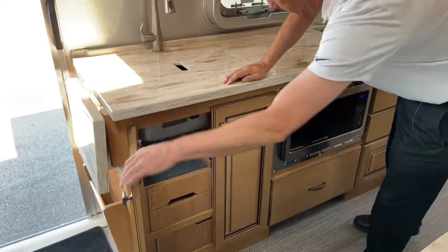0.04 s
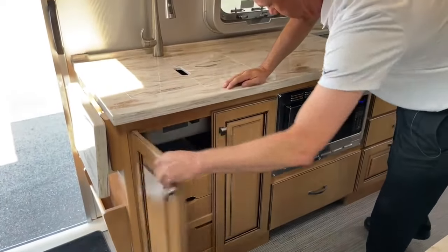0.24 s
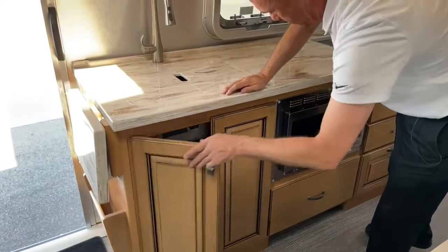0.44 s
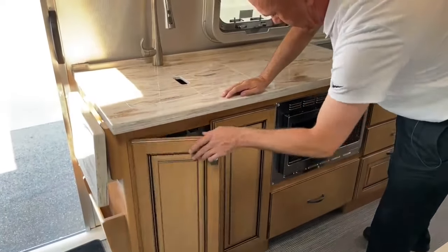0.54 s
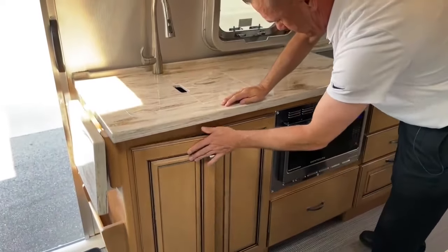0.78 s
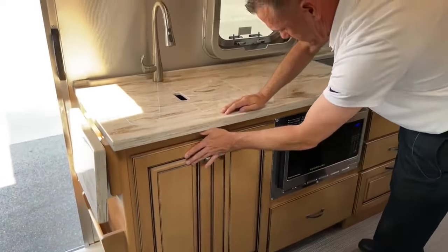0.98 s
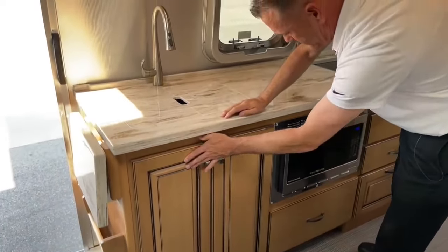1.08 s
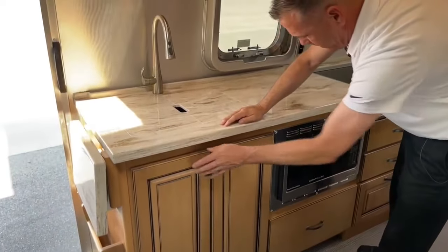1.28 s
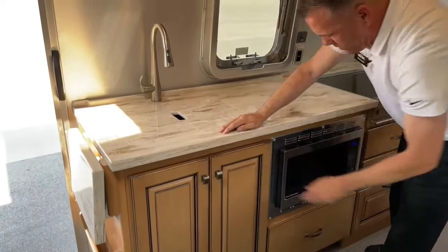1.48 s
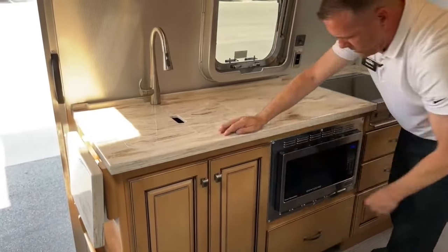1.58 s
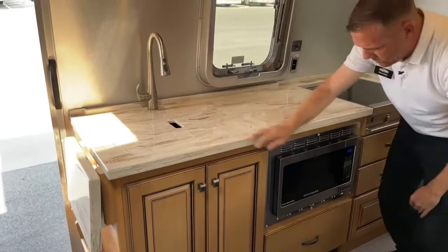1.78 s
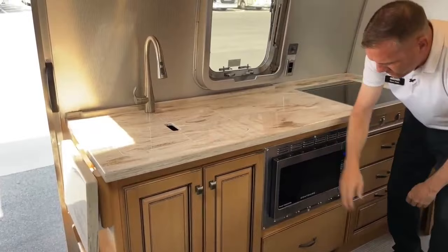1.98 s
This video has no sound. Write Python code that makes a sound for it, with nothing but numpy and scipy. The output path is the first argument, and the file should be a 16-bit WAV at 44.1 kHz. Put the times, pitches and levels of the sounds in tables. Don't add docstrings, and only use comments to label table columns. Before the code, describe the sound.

One sharp wooden knock as a cabinet door closes, latch rattling just before it, then a short woody tail, light ticks and hand rustles. Low ventilation hum throughout, small room, heard from a step away, slightly right.

```python
import sys
import numpy as np
from scipy import signal
from scipy.io import wavfile

SR = 44100
rng = np.random.default_rng(int(sys.argv[2]) if len(sys.argv) > 2 else 0)


def linear_from_db(decibels):
    return 10 ** (np.asarray(decibels, float) / 20)


def put_to_file(sound):
    columns = np.atleast_2d(sound).T
    safe = np.clip(columns, -1, 1)
    whole_steps = np.round(safe * 32767)
    wavfile.write(sys.argv[1], SR, whole_steps.astype(np.int16))


N = 89478
T = np.arange(N) / SR


def rms_one(x):
    return x / np.sqrt(np.mean(x ** 2) + 1e-20)


def drift(rate_hz):
    hop = 40
    r = np.exp(-2 * np.pi * rate_hz * hop / SR)
    steps = rng.standard_normal(N // hop + 2002)
    slow = rms_one(signal.lfilter([1], [1, -2 * r, r * r], steps)[2000:])
    return np.interp(np.arange(N) / hop, np.arange(len(slow)), slow)


def ring(force, hz, t60):
    r = linear_from_db(-60 / (t60 * SR))
    w = 2 * np.pi * hz / SR
    return signal.lfilter([0, np.sin(w)], [1, -2 * r * np.cos(w), r * r], force + 1e-18)


def band_filter(low_hz, high_hz):
    return signal.butter(2, [low_hz, min(high_hz, SR / 2.1)], "band", fs=SR, output="sos")


def band(low_hz, high_hz):
    noise = rng.standard_normal(N + 8000)
    return rms_one(signal.sosfilt(band_filter(low_hz, high_hz), noise)[8000:])


def band_click(start, low_hz, high_hz):
    click = 1.0 * (np.arange(N) == int(start * SR))
    sos = band_filter(low_hz, high_hz)
    out = signal.sosfilt(np.vstack([sos, sos]), click + 1e-18)
    return out / np.abs(out).max()


def around(hz, octaves):
    return hz * 2 ** (-octaves / 2), hz * 2 ** (octaves / 2)


def dying(start, t60, rise=1 / 4000):
    t = np.maximum(T - start, 0)
    return (1 - np.exp(-t / rise)) * linear_from_db(-60 * t / t60)


def swell(start, length, attack_share):
    corners = [start, start + attack_share * length, start + length]
    return np.sin(np.pi / 2 * np.interp(T, corners, [0, 1, 0])) ** 1.3


# (frequency [Hz], level [dB per Hz])
HUM_COLOUR = [(25, -4), (110, -1.5), (320, -11), (950, -10.5), (1250, -19), (3000, -38), (6000, -57),
              (15500, -58.5)]
# (frequency [Hz], width [Hz], level [dB])
CABIN_RESONANCES = [(78.4, 19.6, -45), (122.6, 10.1, -49), (180.7, 26, -53.5), (253, 56, -58.5),
                    (474, 73, -52.5), (792, 62, -60.5), (920, 144, -55.5)]
HUM_DB, HUM_PATCHY_DB = -43, .6


def hum():
    hz, db = np.transpose(HUM_COLOUR)
    edges = 22 * 2 ** np.arange(0, 10, .5)
    wide = np.zeros(N)
    for low, high in zip(edges, edges[1:]):
        density_db = np.interp(np.log(low * high) / 2, np.log(hz), db)
        level = linear_from_db(density_db + HUM_PATCHY_DB * drift(9.7))
        wide += level * np.sqrt(high - low) * band(low, high)
    peaks = np.zeros(N)
    for centre, width, peak_db in CABIN_RESONANCES:
        level = linear_from_db(peak_db + HUM_PATCHY_DB * drift(7))
        peaks += level * band(centre - width / 2, centre + width / 2)
    return linear_from_db(HUM_DB) * rms_one(wide) + peaks


# (start [s], length [s], centre [Hz], width [octaves])
RUBS = [(0, .24, 2650, .2), (-.02, .26, 4150, .1), (.11, .16, 11500, 1.0), (.1, .52, 10800, .25),
        (.15, .45, 9500, 1.5), (.1, .2, 4500, 1.3), (1.29, .3, 3500, .8), (1.46, .17, 7800, 1.5),
        (1.43, .22, 2400, 1.1), (1.6, .3, 1300, .6), (1.55, .3, 4000, 1.2), (1.815, .12, 9000, 1.6),
        (1.94, .09, 4200, .9), (1.82, .06, 850, .6), (1.4, .8, 10000, 1.3), (1.8, .2, 3200, 1.2),
        (1.945, .07, 9500, 1.1)]
RUB_LEVELS = [-63, -72.5, -66.5, -73, -73, -68.5, -73, -68, -59.5, -55.5, -69.5, -69.5, -59.5, -41.5, -77,
              -64.5, -71]
RUB_PATCHY_DB, RUB_ATTACK_SHARE = 1.2, .3


def rubs():
    out = np.zeros(N)
    for (start, length, hz, octaves), db in zip(RUBS, RUB_LEVELS):
        level = linear_from_db(db + RUB_PATCHY_DB * drift(47))
        out += level * swell(start, length, RUB_ATTACK_SHARE) * band(*around(hz, octaves))
    return out


# (start [s], level [dB], rattle t60 [s], wood share [dB])
LATCH_CONTACTS = [
    (.9200, -52, .03, 0),
    (.9235, -45, .05, 18),
    (.9426, -26, .025, 3),
    (.9480, -33, .12, 6),
    (.9670, -44, .05, -20),
]
# (frequency [Hz], level [dB], t60 [s])
LATCH_METAL = [(1320, -6, .02), (2000, -6, .01), (3854, -12, .012), (4300, -16, .015), (8882, -10, .015),
               (9232, -13, .02), (11630, -16, .01), (13000, -17, .008), (14800, -19, .008)]
# (frequency [Hz], level [dB], t60 [s])
LATCH_WOOD = [(110, -16, .06), (400, -14, .04), (650, -2, .07), (1030, -13, .04), (1320, -14, .05)]
RATTLE_PER_S, RATTLE_SPREAD_DB, RATTLE_HISS_DB, RATTLE_BODY_DB = 5000, 3.5, -6, 1
LATCH_ROOM_DB, LATCH_ROOM_T60_S, LATCH_ROOM_HZ = -61, .24, 9000


def latch():
    sizes = linear_from_db(RATTLE_SPREAD_DB * np.minimum(rng.exponential(1, N), 4)) * rng.choice([-1, 1], N)
    clicks = rms_one(sizes * (rng.random(N) < RATTLE_PER_S / SR))
    force = np.zeros(N)
    tap = np.zeros(N)
    for start, db, t60, wood_db in LATCH_CONTACTS:
        force += linear_from_db(db) * dying(start, t60)
        tap[int(start * SR)] = linear_from_db(db + wood_db)
    metal = np.zeros(N)
    for hz, db, t60 in LATCH_METAL:
        dealt = rng.standard_normal(N)
        metal += linear_from_db(db) * ring(force * clicks * dealt, hz, t60) * np.sqrt(20 / (t60 * SR))
    hiss = linear_from_db(RATTLE_HISS_DB) * force * band(3500, 18500)
    body = linear_from_db(RATTLE_BODY_DB) * force * band(550, 2100)
    wood = sum(linear_from_db(db) * ring(tap, hz, t60) for hz, db, t60 in LATCH_WOOD)
    air = band(1200, 7500) + .5 * band(5000, 14000) + .53 * band(*around(LATCH_ROOM_HZ, .21))
    room = linear_from_db(LATCH_ROOM_DB) * dying(LATCH_CONTACTS[2][0], LATCH_ROOM_T60_S, rise=.03) * air
    return metal + hiss + body + wood + room


# (start [s], level [dB], frequency [Hz], t60 [s])
AIR_PUSH = (.9440, -19.5, 29, .17)


def air_push():
    start, db, hz, t60 = AIR_PUSH
    return linear_from_db(db) * dying(start, t60, rise=.002) * np.sin(2 * np.pi * hz * (T - start))


# (time [s], level [dB], contact length [s], direction [+1 or -1])
KNOCKS = [
    (.96748, 0, .00041, 1),
    (.97648, -5.5, .00053, 1),
]
# (frequency [Hz], level [dB], t60 [s], first swing [+1 or -1])
PANEL_MODES = [(51, -26, .05, -1), (80, -27, .3, -1), (111, -24, .06, 1), (156, -25, .18, 1),
               (256, -23.5, .19, 1), (284, -22, .2, -1), (435, -12, .018, 1), (731, -5.4, .021, -1),
               (847, -6.5, .037, -1), (1023, -6.8, .029, 1), (1280, -17, .06, -1)]
WOOD_TAIL_DB, WOOD_TAIL_T60_S, WOOD_TAIL_HZ = -23, .2, (280, 900)
BOOM_DB, BOOM_T60_S = -30, .2


def knock():
    force = np.zeros(N)
    for start, db, length, way in KNOCKS:
        force += way * linear_from_db(db) * np.exp(-((T - start) / length) ** 2) / (length * SR)
    panel = sum(way * linear_from_db(db) * ring(force, hz, t60) for hz, db, t60, way in PANEL_MODES)
    bounce = KNOCKS[1][0]
    wood = signal.sosfilt(signal.butter(2, 1300, fs=SR, output="sos"), band(*WOOD_TAIL_HZ))
    tail = linear_from_db(WOOD_TAIL_DB) * dying(bounce, WOOD_TAIL_T60_S, rise=.0015) * wood
    boom = linear_from_db(BOOM_DB) * dying(bounce, BOOM_T60_S, rise=.01) * band(60, 200)
    return panel + tail + boom


# (start [s], length [s], first pitch [Hz], last pitch [Hz], level [dB])
SQUEAKS = [
    (1.083, 0.068, 11100, 11050, -90),
    (1.082, 0.15, 6400, 5970, -81),
    (1.33, .05, 10200, 10500, -79),
    (1.366, .024, 9700, 9250, -79),
    (1.72, 0.17, 10250, 10500, -80),
]


def squeaks():
    out = np.zeros(N)
    for start, length, first_hz, last_hz, db in SQUEAKS:
        pitch = np.interp(T, [start, start + length], [first_hz, last_hz])
        tone = np.sin(2 * np.pi * np.cumsum(pitch) / SR)
        out += linear_from_db(db + 3 * drift(60)) * swell(start, length, .55) * tone
    return out


# (time [s], level [dB], centre [Hz], width [octaves])
TICKS = [(1.294, -61, 10000, 0.96), (1.2984, -39.5, 10000, 1.22), (1.304, -50.5, 9000, .8),
         (1.4010, -34, 1600, 2.3), (1.4010, -44.5, 3460, 0.34), (1.401, -46.5, 11200, 0.48),
         (1.4226, -44, 2000, 1.2), (1.4205, -57, 9900, 0.66), (1.429, -54, 9800, 0.69),
         (1.4415, -57, 4340, .3), (1.441, -47.5, 9100, 0.97), (1.4508, -50.5, 7000, 0.97),
         (1.471, -53, 8450, 1.4), (1.828, -38, 870, 1.1), (1.835, -55, 5960, 1.3), (1.855, -72, 10000, .8),
         (1.9537, -45.5, 4350, 0.83), (1.9535, -55.5, 8170, 0.16), (1.953, -64, 12600, .2),
         (1.9535, -65, 15000, .1), (1.974, -49.5, 3780, 0.85), (1.987, -67, 5000, 1.2)]
TICK_T60_S, TICK_SNAP_DB = .012, 20


def ticks():
    out = np.zeros(N)
    for start, db, hz, octaves in TICKS:
        edges = around(hz, octaves)
        fizz = linear_from_db(-TICK_SNAP_DB) * dying(start, TICK_T60_S) * band(*edges)
        out += 2 * linear_from_db(db) * (band_click(start, *edges) + fizz)
    return out


PAN_DB = 2.25


def scene():
    mono = hum() + rubs() + latch() + air_push() + knock() + squeaks() + ticks()
    return mono * linear_from_db(np.array([[-PAN_DB - .3], [PAN_DB - .3]]))


def roll_off(x):
    return signal.sosfilt(signal.butter(12, 16500, fs=SR, output="sos"), x)


def record(dry):
    top_cut = signal.cheby2(10, 50, 16300, fs=SR, output="sos")
    mix = signal.sosfilt(top_cut, dry)
    return roll_off(mix)


dry = scene()
out = record(dry)
put_to_file(out)
```